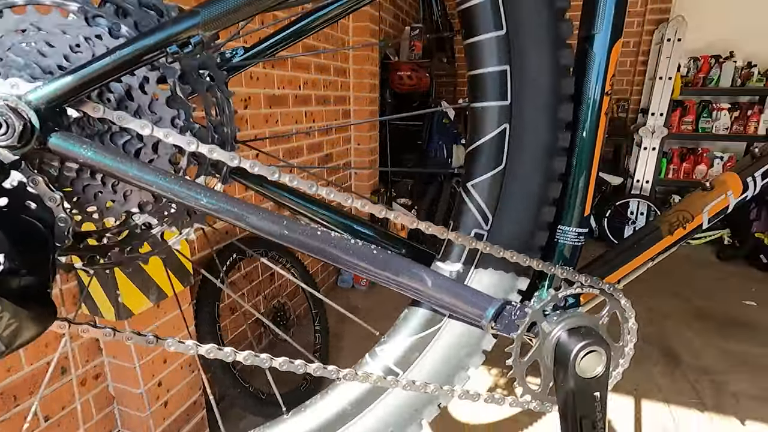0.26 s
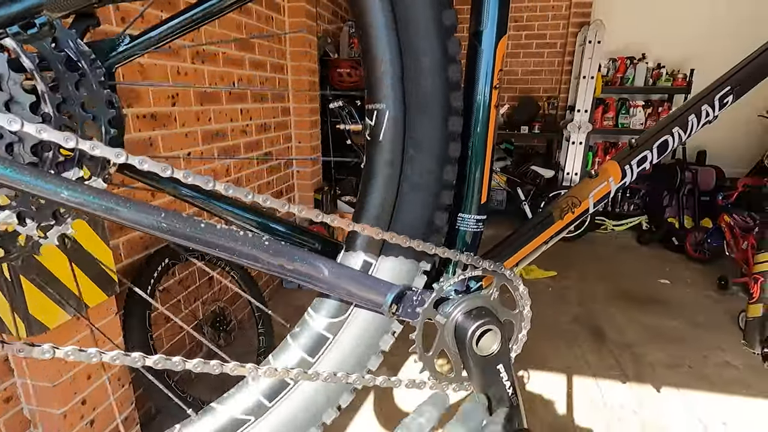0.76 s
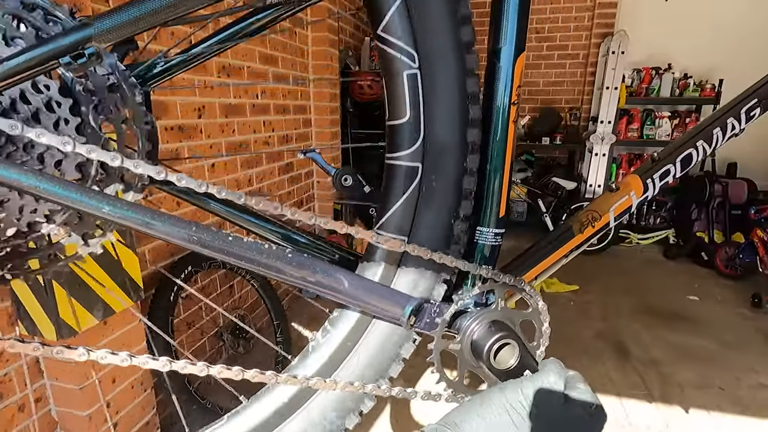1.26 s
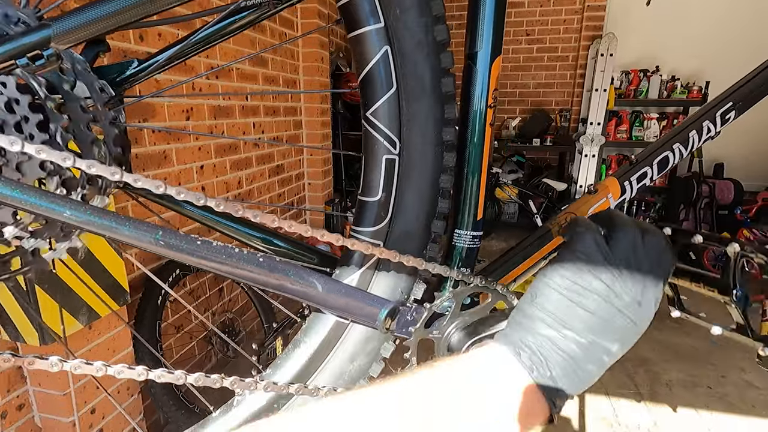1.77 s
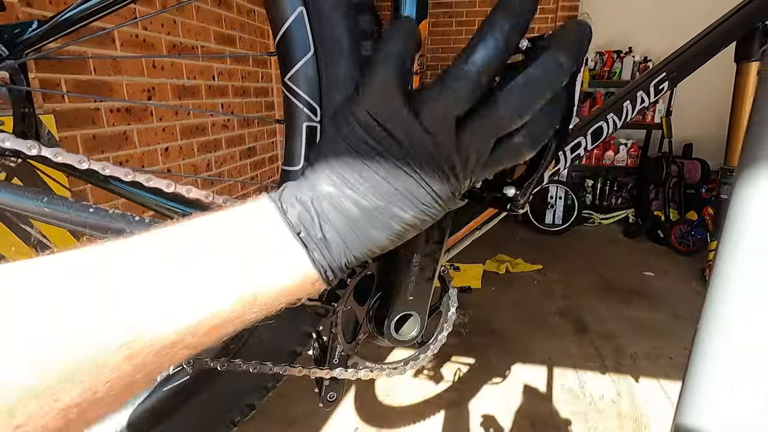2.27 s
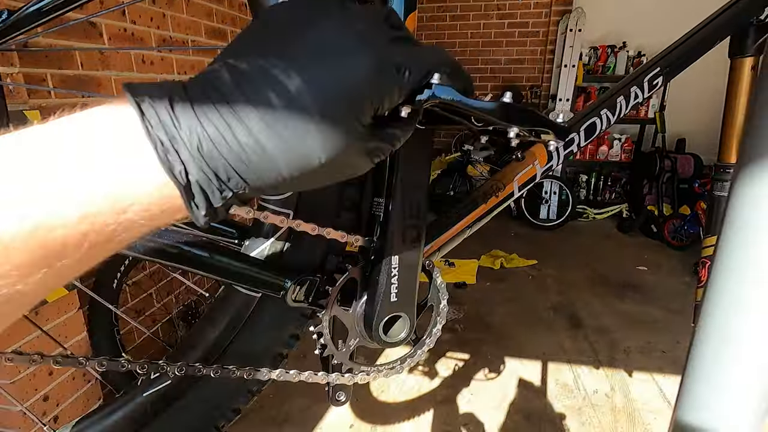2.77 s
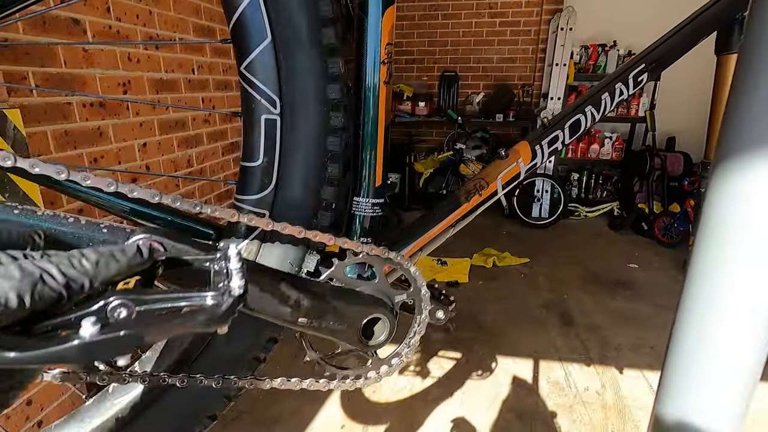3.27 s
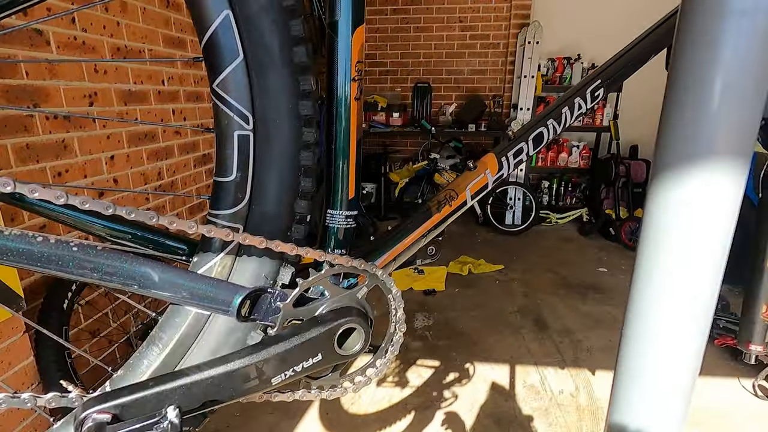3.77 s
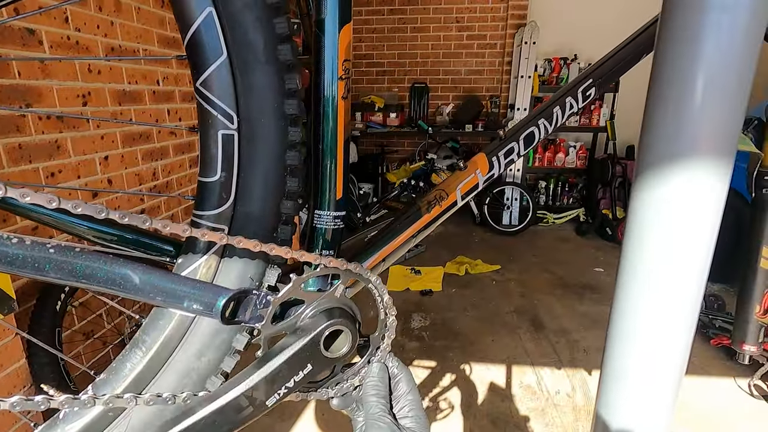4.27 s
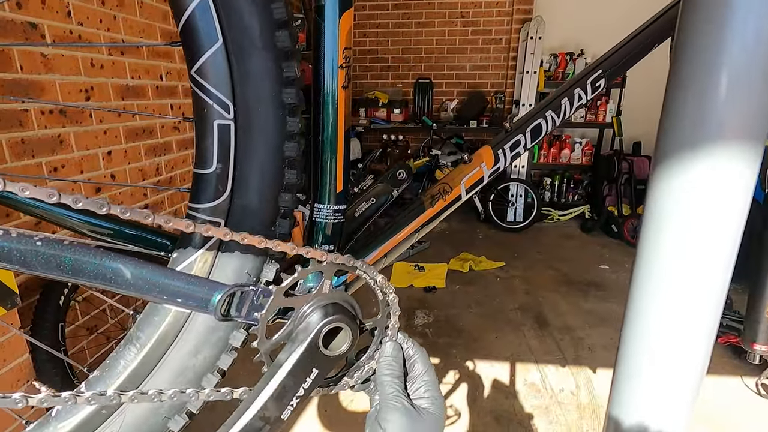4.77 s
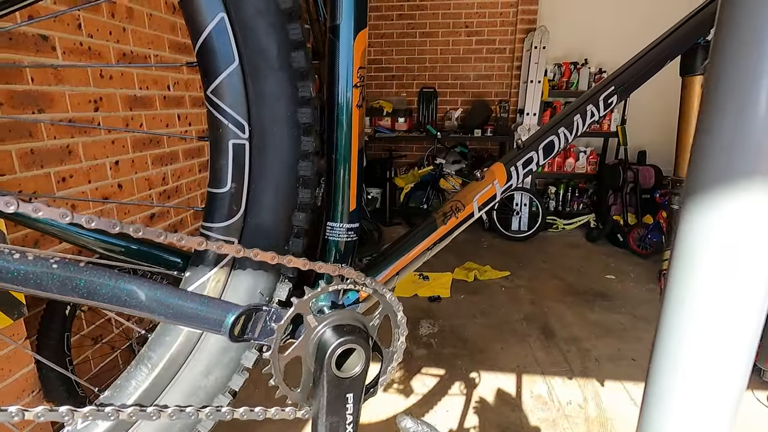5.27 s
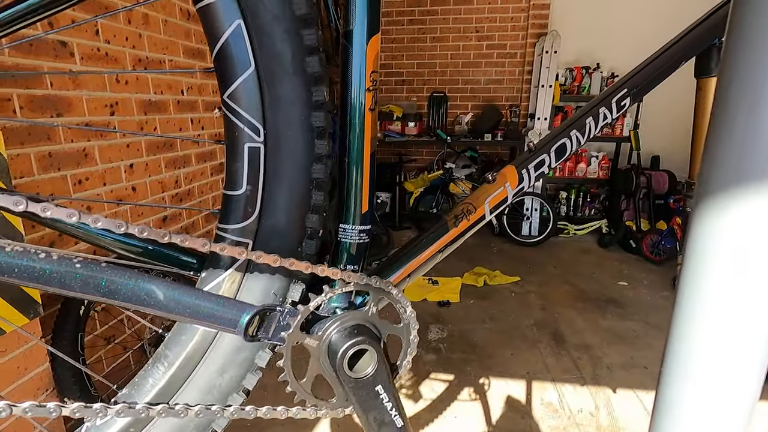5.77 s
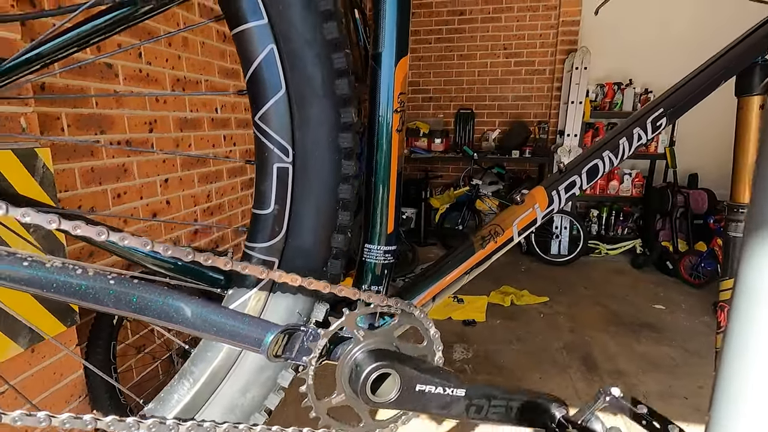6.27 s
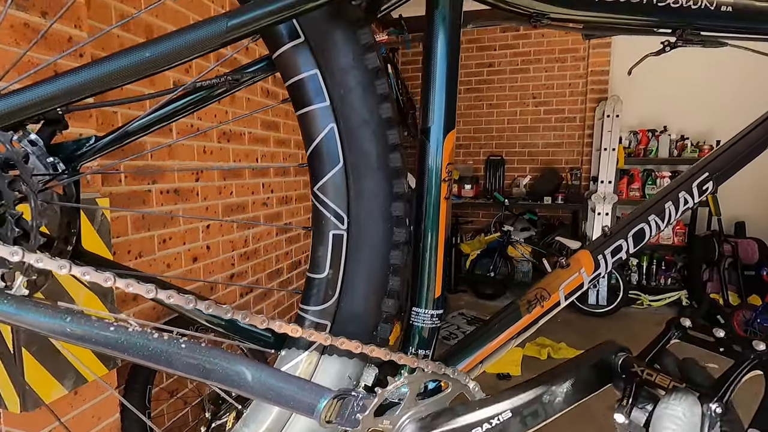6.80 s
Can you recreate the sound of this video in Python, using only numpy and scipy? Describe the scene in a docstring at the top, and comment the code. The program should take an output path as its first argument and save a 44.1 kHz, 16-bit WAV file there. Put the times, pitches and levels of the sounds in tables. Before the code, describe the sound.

A bicycle is cranked backwards by hand in a garage, and its rear hub gives a fast metallic ratchet buzz. The buzz comes in several runs, slowing to single ringing clicks between pushes. The chain rustles faintly and the frame hums softly over low room rumble. Toward the end, the close hand-held microphone picks up a few low thumps.

```python
"""A fast ratchet buzz from a bicycle's rear hub, slowing to single clicks between pushes of the crank.
The bicycle hangs in a stand in a garage and is cranked backwards by hand. Three pawls drop into each
tooth and ring hub, cassette and spokes. The chain rustles faintly and the frame hums.
The hand-held microphone adds a few low thumps over the rumble of the room."""
import sys
import numpy as np
from scipy import signal
from scipy.fft import rfft, irfft
from scipy.io import wavfile

SR = 44100
rng = np.random.default_rng(int(sys.argv[2]) if len(sys.argv) > 2 else 0)


def pcm_store(signal):
    """Save signal as 16-bit PCM."""
    levels = np.round(np.clip(np.atleast_2d(signal), -1, 1) * 32767)
    wavfile.write(sys.argv[1], SR, levels.astype(np.int16).T)


N = 310464
TIME = np.arange(N) / SR

# Room rumble spectrum (frequency [Hz], relative density [dB])
ROOM_SPECTRUM = [(20, 2), (48, -5), (80, -8), (130, -16.5), (210, -11.5), (300, -16), (600, -21),
                 (1500, -24), (4000, -42.5), (16000, -64)]
# Grip rumble spectrum (frequency [Hz], relative density [dB])
GRIP_SPECTRUM = [(20, 6), (45, 10), (85, -3), (140, -8), (300, -24), (800, -67)]
# Grip shifts on the microphone (start [s], length [s], level [dB])
GRIP_MOVES = [(0.155, .05, -53), (1.3, 0.25, -52), (3.423, 0.45, -49), (4.313, 0.065, -48),
              (4.74, 0.29, -35), (5.153, 0.081, -33), (5.576, 0.46, -37.5), (6.292, 0.29, -26.5),
              (6.678, 0.35, -33.5)]
# Handling thumps (time [s], level [dB], pitch [Hz], t60 [s], scuff level [dB])
HAND_THUMPS = [(0.508, -31.5, 150, 0.15, -51), (2.18, -36.5, 463, 0.083, -40),
               (4.778, -19.5, 83.32, 0.085, -39), (5.193, -20, 54.5, .08, -28),
               (5.717, -32, 157, 0.24, -34.5), (5.806, -17, 45, 0.12, -57), (6.316, -20.5, 197, 0.078, -43),
               (6.36, -26, 55, 0.1, -58), (6.509, -7, 68, 0.086, -27.5), (6.789, -11.5, 60.7, 0.081, -45),
               (7.019, -7, 117, 0.033, -27.5)]
# Frame and stand modes (frequency [Hz], width [Hz], relative gain [dB])
FRAME_MODES = [(153, 11.8, 4.5), (200, 17, -24), (330, 31, -11.5), (503, 29, -8)]
# Jolts to the frame (time [s], hum level [dB])
FRAME_JOLTS = [(0.46, -48), (1.38, -49), (3.42, -54), (3.97, -50), (5.18, -40), (5.69, -45), (6.28, -49)]
# Chain rustle spectrum (frequency [Hz], relative density [dB])
CHAIN_SPECTRUM = [(400, -6), (900, -14), (1250, -4), (1900, -2), (3200, -13), (4800, -5.5), (7000, -20),
                  (12000, -33), (16000, -47)]
# Hub, cassette and spoke modes (frequency [Hz], width [Hz], gain [dB])
METAL_MODES = [(970, 70, 10), (1617, 22, -1), (1746, 57, 0), (1805, 100, 6), (1925, 15, 3), (2101, 20, 3),
               (2423, 20, 4), (2475, 55, 5), (2598, 26, 5), (2680, 90, 4), (2851, 29, 1), (3040, 28, 5),
               (3544, 36, 4), (4285, 43, 0), (5625, 53, -2), (5797, 70, 10), (6670, 120, -1),
               (7843, 90, -4), (8840, 130, -4), (12000, 592, 3)]
# Hub speed, one curve per crank push (time [s], speed [teeth/s])
PUSH_SPEEDS = [
    [(0.002, 50.9), (0.084, 57.5), (0.265, 80.9), (0.412, 83.7), (0.481, 58.2), (0.568, 29.3),
     (0.608, 16.6), (0.644, 46.4), (0.711, 24.9)],
    [(1.212, 26.6), (1.336, 57.0), (1.526, 81.7), (1.558, 77.5), (1.832, 67.2), (1.858, 75.3),
     (1.975, 74.4), (2.154, 64.0), (2.213, 37.3), (2.295, 25.8)],
    [(2.839, 29.8), (3.004, 44.0), (3.097, 62.5), (3.248, 65.2), (3.444, 52.1), (3.514, 42.0),
     (3.583, 42.9), (3.609, 32.0), (3.78, 25.1)],
    [(4.785, 28.5), (4.818, 35.5), (5.004, 39.3), (5.034, 30.3), (5.139, 30.3)],
    [(5.156, 76.5), (5.173, 80.9), (5.189, 62.5), (5.349, 37.0), (5.391, 43.4), (5.511, 26.7)],
    [(5.689, 32.7), (5.756, 32.9), (5.772, 38.7), (5.852, 39.0), (6.009, 29.3)],
    [(6.037, 25.9), (6.125, 49.4), (6.328, 56.6), (6.429, 54.9), (6.61, 35.6), (6.8, 22.5), (6.872, 30.6),
     (7.039, 28.3)],
]
# Click strength during pushes (time [s], relative level [dB])
PUSH_FORCE_DB = [(0, -27), (0.12, -29), (0.22, -30), (0.35, -27), (0.6, -26.5), (1.22, -28), (1.32, -26),
                 (1.55, -26.5), (1.95, -26), (2.1, -24), (2.26, -29.5), (2.87, -27), (3.08, -23.5),
                 (3.55, -24.5), (5.1, -25), (5.2, -22), (6.0, -25), (6.4, -22.5), (7.03, -23)]
# Single teeth as the hub creeps between pushes (time [s], relative click level [dB], ping peak [dB])
CREEP_CLICKS = [(0.758, -26, -29), (0.844, -26.5, -33), (0.909, -27.0, -23.5), (0.977, -27, -40),
                (1.05, -27, -31), (1.119, -28.5, -32), (1.17, -26.5, -39), (2.328, -28, -23),
                (2.379, -29, -31), (3.829, -27, -30), (3.889, -27, -42), (3.956, -25.0, -23),
                (4.013, -27, -17.0), (4.061, -26.5, -20), (4.116, -25.0, -18), (4.18, -24.5, -25),
                (4.245, -26.5, -25), (4.312, -31.0, -21.5), (4.406, -31.0, -23.5), (4.666, -27, -23),
                (4.74, -25, -20), (5.547, -24.0, -29), (5.602, -22.5, -23)]
# Click spectrum (frequency [Hz], relative density [dB])
CLICK_SPECTRUM = [(130, -12), (300, -22.5), (780, -20), (950, -16.5), (1250, -10), (1650, -6.5), (2100, 3),
                  (2800, -11.5), (3250, -3.5), (4700, 0.5), (7000, -5.5), (10000, -9), (12500, -17.5),
                  (16000, -15)]
# Click width (frequency [Hz], side over mid [dB])
CLICK_SIDE_DB = [(200, -35), (1000, -13), (2000, -10.5), (5000, -17.5), (8000, -12.5), (12500, -3)]
# Click balance (frequency [Hz], left over right [dB])
CLICK_PAN_DB = [(500, -2.5), (1000, -0.5), (2000, 0.6), (4000, -0.5), (8000, 3.5), (12500, 1)]
# Decay of the wheel's dense ring (frequency [Hz], t60 [s])
WHEEL_T60_S = [(200, 0.027), (1000, 0.2), (1800, 0.021), (4000, 0.049), (6000, 0.046), (9000, 0.048),
               (14000, 0.046)]
# Garage tail at onset (frequency [Hz], level over wheel ring [dB])
GARAGE_DB = [(200, -32), (1000, -21.5), (2000, -2.5), (4000, -6.5), (7000, -15), (13000, -11.5)]
# Garage tail decay (frequency [Hz], t60 [s])
GARAGE_T60_S = [(200, 0.21), (2000, 0.34), (5000, 0.22), (9000, 0.29), (14000, 0.093)]
# Cassette ring near 1.7 kHz (time [s], gain [dB])
CASSETTE_DB = [(0, 5.5), (0.13, 15.5), (0.26, 5.5), (0.7, 4.5), (1.1, -9), (1.7, -6), (2.15, -2.5),
               (2.85, 2.5), (3.05, -9), (3.65, -0.5), (4.2, 1), (5.35, 1.5), (6.55, -2.5), (6.95, 4.5)]
# Click treble (low [Hz], high [Hz], far gain [dB], extra when close [dB], speed slope [dB per tooth/s])
TREBLE_BANDS = [(2200, 2800, -1.43, 3.0, 0.0428), (5827, 5950, 1.5, 1.0, 0.0123),
                (7400, 15000, -4.5, 3.5, 0.0682), (14000, 18300, -9.5, 1.5, 0.0181)]


def from_db(db):
    """Decibels to gain."""
    return np.exp(np.asarray(db) * (np.log(10) / 20))


def rms_one(x):
    """Scale to rms 1."""
    return x / np.sqrt(np.mean(x ** 2) + 1e-20)


def in_time(curve):
    """Curve value at every sample."""
    return np.interp(TIME, *np.transpose(curve))


def at_hz(table, hz):
    """Table value on a log-frequency axis."""
    table_hz, values = np.transpose(table)
    return np.interp(np.log(hz), np.log(table_hz), values)


def band(x, low_hz, high_hz, order=2):
    """Butterworth band-pass."""
    return signal.sosfilt(signal.butter(order, [low_hz, high_hz], "band", fs=SR, output="sos"), x)


def resonance(x, hz, width_hz):
    """Two-pole resonator, peak gain 1."""
    r = np.exp(-np.pi * width_hz / SR)
    feedback = [1, -2 * r * np.cos(2 * np.pi * hz / SR), r * r]
    return signal.lfilter(np.array([1, 0, -1]) * (1 - r * r) / 2, feedback, x + 1e-18)


def stereo(mid, side):
    """Mid/side to left/right."""
    return np.array([mid + side, mid - side])


def noise(spectrum, side_db=-6):
    """Steady coloured stereo noise, rms 1, rolled off below 20 Hz."""
    hz = np.maximum(np.fft.rfftfreq(N, 1 / SR), 1)
    colour = from_db(at_hz(spectrum, hz)) / np.sqrt(1 + (20 / hz) ** 4)
    mid, side = irfft(rfft(rng.standard_normal((2, N))) * colour, N)
    return rms_one(stereo(mid, from_db(side_db) * side))


def wander(knots_per_s):
    """Gaussian random values joined by straight lines."""
    knots_s = np.arange(0, TIME[-1], 1 / knots_per_s)
    return np.interp(TIME, knots_s, rng.standard_normal(N)[:len(knots_s)])


def envelope(t, peak_db, t60_s, rise_s):
    """Linear rise from t = 0, then exponential decay."""
    return np.clip(t / rise_s, 0, 1) * from_db(peak_db - 60 * np.maximum(t - rise_s, 0) / t60_s)


def tooth_events(ping_offset_db=0.5):
    """All passing teeth in order: time [s], relative click level [dB], ping peak [dB]."""
    tooth_s = []
    for push in PUSH_SPEEDS:
        during = (TIME >= push[0][0]) & (TIME <= push[-1][0])
        passed = np.cumsum(in_time(push)[during]) / SR
        tooth_s.extend(np.interp(np.arange(passed[-1]), passed, TIME[during]))
    click_db = np.interp(tooth_s, *np.transpose(PUSH_FORCE_DB))
    pushed = np.column_stack([tooth_s, click_db, click_db + ping_offset_db])
    rows = np.vstack([pushed, CREEP_CLICKS])
    return rows[np.argsort(rows[:, 0])].T


def teeth_passed(tooth_s):
    """Running tooth count at every sample."""
    return np.interp(TIME, tooth_s, np.arange(len(tooth_s)))


def room_rumble(level_db=-50):
    """Steady low noise of the garage."""
    return from_db(level_db) * noise(ROOM_SPECTRUM)


def grip_rumble(rest_db=-50, waver_db=4.5, edge_s=0.065):
    """The hand is never quite still and rumbles more when it shifts."""
    level = from_db(rest_db + waver_db * wander(knots_per_s=9))
    for start_s, length_s, db in GRIP_MOVES:
        inside_s = np.minimum(TIME - start_s, start_s + length_s - TIME)
        level += from_db(db) * np.clip(.5 + inside_s / edge_s, 0, 1)
    return level * noise(GRIP_SPECTRUM)


def handling(scuff_t60_s=0.12, pan_db=0.7):
    """Soft knocks on the microphone, each a damped low tone with a scuff, over the grip rumble."""
    knocks, scuffs = np.zeros((2, N + SR))
    t = TIME[:SR]
    for start_s, db, hz, t60_s, scuff_db in HAND_THUMPS:
        span = slice(round(start_s * SR), round(start_s * SR) + SR)
        rise = 1 - np.exp(-2 * hz * t)   # soft contact builds over part of a cycle
        knocks[span] += rise * from_db(db - 60 * t / t60_s) * np.sin(2 * np.pi * hz * t)
        scuffs[span] += rise * from_db(scuff_db - 60 * t / scuff_t60_s)
    white = stereo(*rng.standard_normal((2, N)) * [[1], [.5]])
    rub = rms_one(band(white, 116, 386))
    return (knocks[:N] + scuffs[:N] * rub + grip_rumble()) * from_db([[-pan_db], [pan_db]])


def frame_hum(rest_db=-57.5, side_db=-5):
    """The wheel shakes frame and stand, which hum in low modes, louder after each jolt."""
    shake = stereo(*rng.standard_normal((2, N)) * from_db([[0], [side_db]]))
    hum = sum(from_db(db) * resonance(shake, hz, width_hz) for hz, width_hz, db in FRAME_MODES)
    jolts = sum(envelope(TIME - start_s, db, t60_s=0.9, rise_s=0.04) for start_s, db in FRAME_JOLTS)
    return (from_db(rest_db) + jolts) * rms_one(band(hum, 137, 430))


def chain(tooth_s, level_db=-43, t60_s=1.13, links_per_s=70, flutter_db=1.0, take_up_s=2.765):
    """Links rustle over the sprockets and ring the metal, louder with hub speed; slack is taken up once."""
    flutter = from_db(flutter_db * wander(2 * links_per_s))
    rustle = noise(CHAIN_SPECTRUM, side_db=-11.5) * flutter
    rings = sum(from_db(db) * resonance(rustle, hz, width_hz) for hz, width_hz, db in METAL_MODES)
    steps = np.bincount((tooth_s * SR).astype(int), minlength=N)[:N]
    energy = signal.lfilter([1], [1, -from_db(-60 / (t60_s * SR)) ** 2], steps)
    running = from_db(level_db) * rms_one(np.sqrt(energy))
    take_up = envelope(TIME - take_up_s, peak_db=-48.5, t60_s=0.22, rise_s=0.0041)
    return (running + take_up) * rms_one(rustle + rings)


def cassette_pings(tooth_s, ping_db, pitch_hz=1800, detune=0.03, delay_s=0.00097, jitter_s=0.0002):
    """One damped cassette ping per tooth, each slightly off pitch."""
    out, t = np.zeros(N + SR), TIME[:SR // 20]
    for start_s, db, (off, late) in zip(tooth_s, ping_db, rng.standard_normal((len(tooth_s), 2))):
        at = max(round((start_s + delay_s + jitter_s * late) * SR), 0)
        tone = np.sin(2 * np.pi * pitch_hz * (1 + detune * off) * t)
        out[at:at + len(t)] += envelope(t, db, t60_s=0.015, rise_s=0.0016) * tone
    return out[:N]


def click_response(crack_db=9.0, crack_t60_s=0.0051, garage_side_db=-11.0):
    """Unit-energy response to one pawl at one wheel position: crack, dense wheel ring, garage tail."""
    t = TIME[:round(.4 * SR)]
    edges_hz = np.geomspace(110, 17000, 23)
    white = rng.standard_normal((2, 3, len(t)))
    crack = from_db(crack_db - 60 * t / crack_t60_s)
    out = 0
    for k, (low_hz, high_hz) in enumerate(zip(edges_hz, edges_hz[1:])):
        hz = np.sqrt(low_hz * high_hz)
        mid, side, garage_side = white[k % 2]   # adjacent bands are uncorrelated
        near = np.hypot(crack, from_db(-60 * t / at_hz(WHEEL_T60_S, hz)))
        tail = from_db(at_hz(GARAGE_DB, hz) - 60 * t / at_hz(GARAGE_T60_S, hz))
        spread = side * near * from_db(at_hz(CLICK_SIDE_DB, hz))
        spread += garage_side * tail * from_db(garage_side_db)
        part = rms_one(band(stereo(mid * np.hypot(near, tail), spread), low_hz, high_hz))
        channel_db = at_hz(CLICK_SPECTRUM, hz) + at_hz(CLICK_PAN_DB, hz) * np.array([[.5], [-.5]])
        out += part * np.sqrt(high_hz - low_hz) * from_db(channel_db)
    return out / np.sqrt(np.mean(np.sum(out ** 2, axis=1)))


def pawl_drops(tooth_s, click_db, delays_s=(0, 0.0011156, 0.0022), jitter_s=0.00022, uneven_db=1.0):
    """Three pawls drop into each tooth in quick succession: one impulse train per pawl."""
    crawl = np.clip(np.gradient(tooth_s) / 0.064, 0, 1) ** 2   # 1 from 64 ms per tooth up
    pawls_db = (-5.0, 0, -3.0 - 1.5 * crawl)   # the second dominates, more so at a crawl
    drops = np.zeros((3, N))
    for pawl, (delay_s, pawl_db) in enumerate(zip(delays_s, pawls_db)):
        late, strong = rng.standard_normal((len(tooth_s), 2)).T
        at = np.clip((tooth_s + delay_s + jitter_s * late) * SR, 0, N - 1).astype(int)
        drops[pawl, at] = from_db(click_db + pawl_db + uneven_db * strong)
    return drops


def cassette_swell(x, tooth_s, depth_db=2, period_teeth=13.65, peak_tooth=13.5):
    """The cassette's ring swells and fades as the hub turns."""
    phase = 2 * np.pi * (teeth_passed(tooth_s) - peak_tooth) / period_teeth
    ring_db = in_time(CASSETTE_DB) + depth_db * np.cos(phase)
    return x + (from_db(ring_db) - 1) * band(x, 1550, 1800, order=1)


def brightness(x, tooth_s, draw_back_s=2.01, move_lasts_s=0.16):
    """Clicks brighten with speed and dull as the microphone draws back from the hub."""
    teeth_per_s = np.interp(TIME, tooth_s, 1 / np.gradient(tooth_s))
    close = np.clip(.5 + (draw_back_s - TIME) / move_lasts_s, 0, 1)
    for low_hz, high_hz, far_db, close_db, slope in TREBLE_BANDS:
        gain = from_db(far_db + close_db * close + slope * teeth_per_s)
        x = x + (gain - 1) * band(x, low_hz, high_hz, order=1)
    return x


def freehub(tooth_s, click_db, gain_db=22.0, snap_db=-5.5, swell_db=5.0,
            teeth_per_turn=24, pawl_offset_turns=0.11, positions=6):
    """Pawl drops ring the wheel and its sharp modes; the response changes round each turn."""
    drops = pawl_drops(tooth_s, click_db)
    turns = teeth_passed(tooth_s) / teeth_per_turn + np.arange(3)[:, None] * pawl_offset_turns
    pawl, at = np.nonzero(drops)
    clicks, rings = np.zeros((2, 2, N))
    for k in range(positions):   # equal-power crossfade between wheel positions
        away = np.abs((turns[pawl, at] * positions - k + 1) % positions - 1)
        struck = np.bincount(at, drops[pawl, at] * np.sqrt(np.clip(1 - away, 0, 1)), N)
        clicks += signal.oaconvolve(struck[None], click_response(), axes=1)[:, :N]
    for hz, width_hz, db in METAL_MODES:   # each mode swells and fades as its nodes pass the pawls
        phase, lobes = rng.uniform(0, 2 * np.pi), rng.uniform(0.5385, 2)
        mode_db = db + swell_db * np.sin(2 * np.pi * lobes * turns[0] + phase)
        rings += resonance(clicks * from_db(mode_db), hz, width_hz)
    # The hardest pawl also arrives directly, as a dry snap.
    snap = from_db(snap_db) * band(drops[1] + 1e-9 * rng.standard_normal(N), 2200, 12000)
    return from_db(gain_db) * (clicks + rings + snap)


def scene():
    """Hub, cassette, chain, frame, handling and room."""
    tooth_s, click_db, ping_db = tooth_events()
    hub = cassette_swell(freehub(tooth_s, click_db), tooth_s)
    ratchet = brightness(hub, tooth_s) + cassette_pings(tooth_s, ping_db)
    return ratchet + chain(tooth_s) + frame_hum() + handling() + room_rumble()


def record(dry):
    """Steep low-pass at 15.75 kHz."""
    return signal.sosfilt(signal.ellip(10, .1, 80, 15750, fs=SR, output="sos"), dry)


dry = scene()
out = record(dry)
pcm_store(out)
```